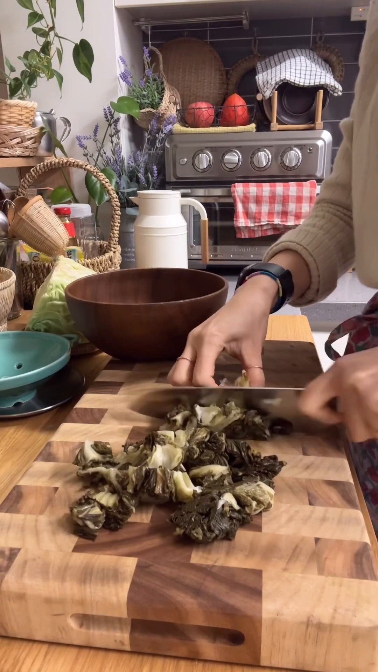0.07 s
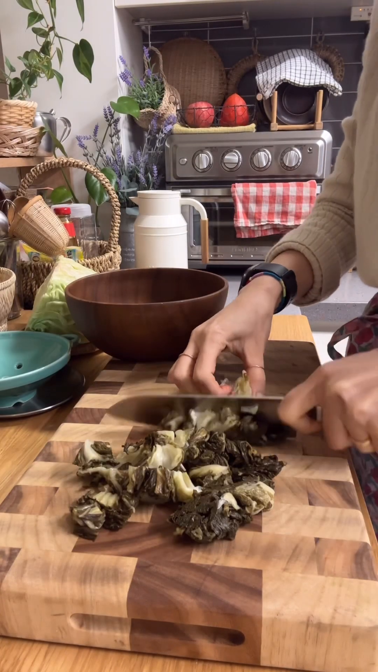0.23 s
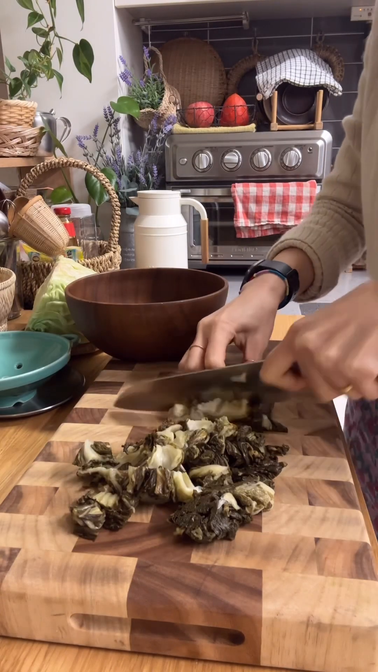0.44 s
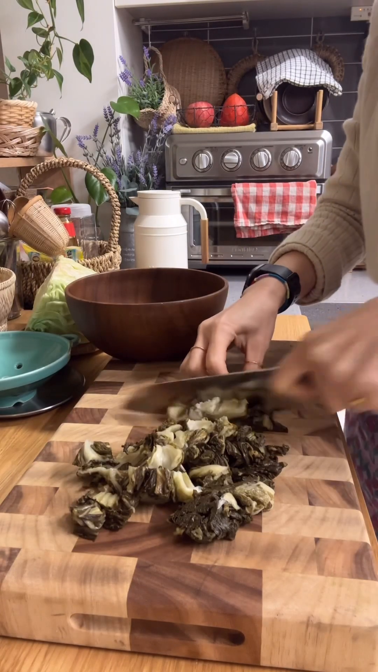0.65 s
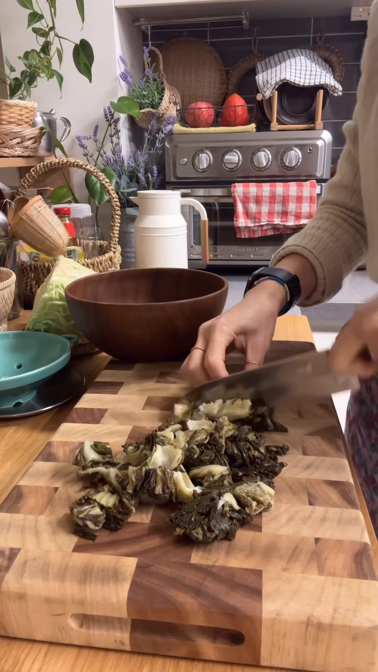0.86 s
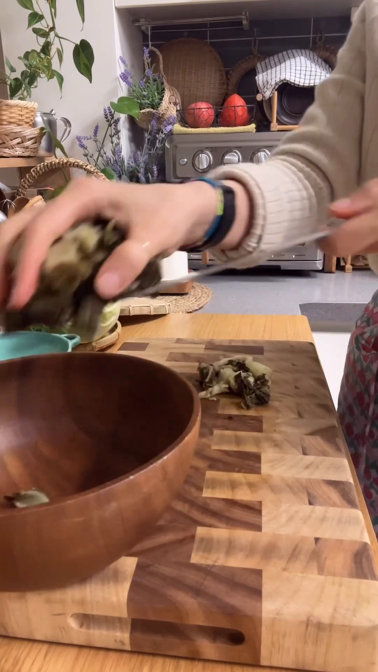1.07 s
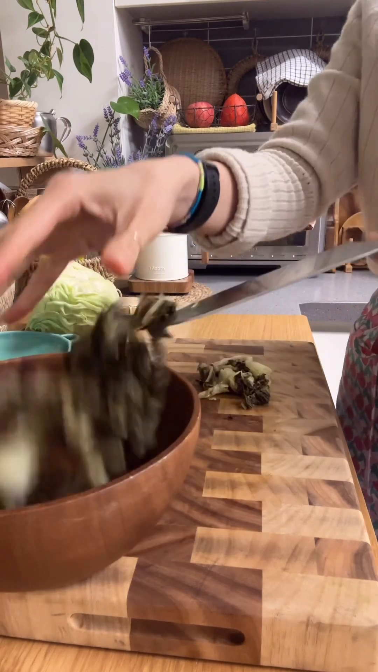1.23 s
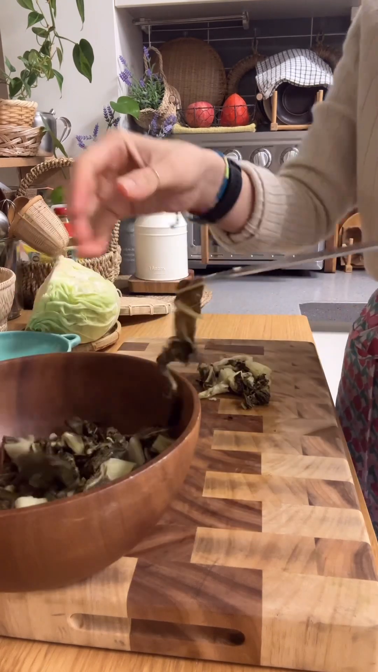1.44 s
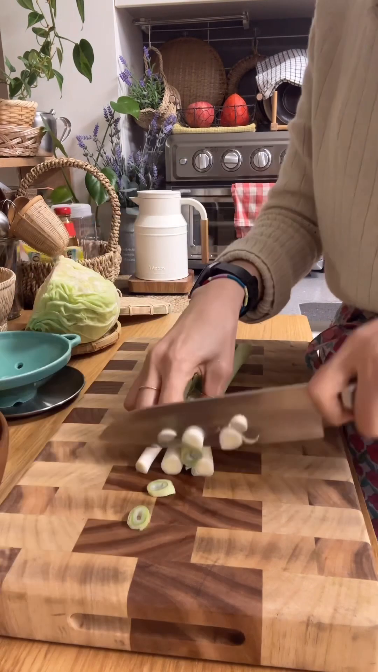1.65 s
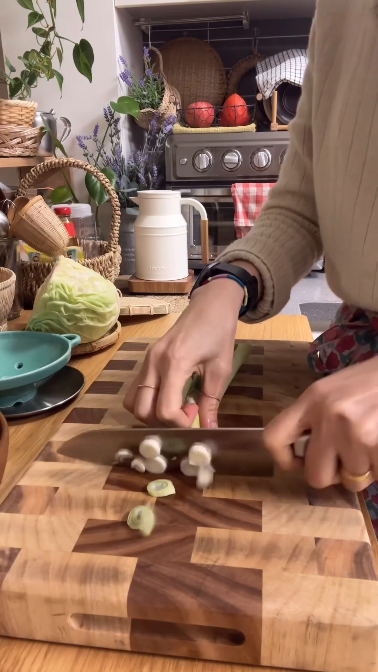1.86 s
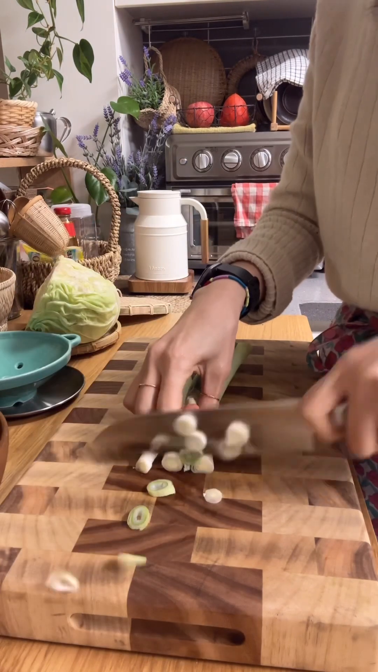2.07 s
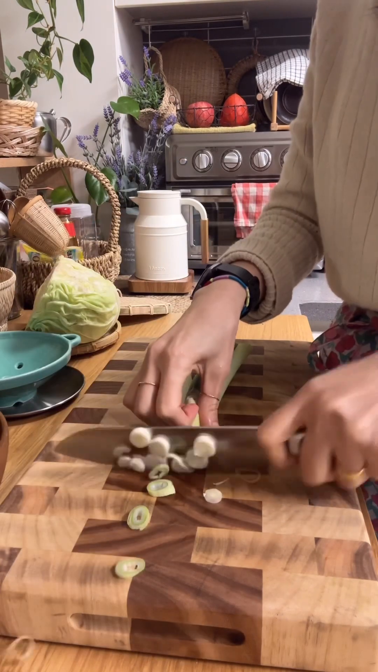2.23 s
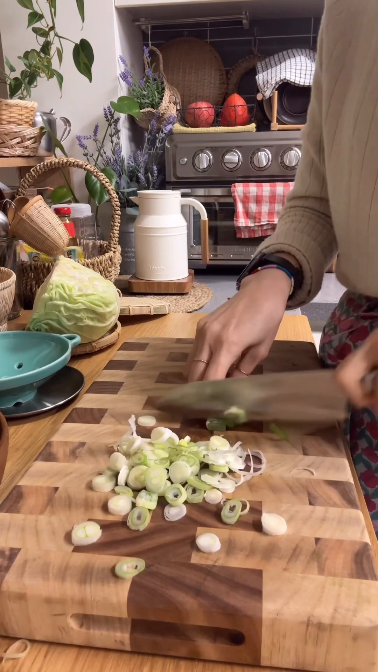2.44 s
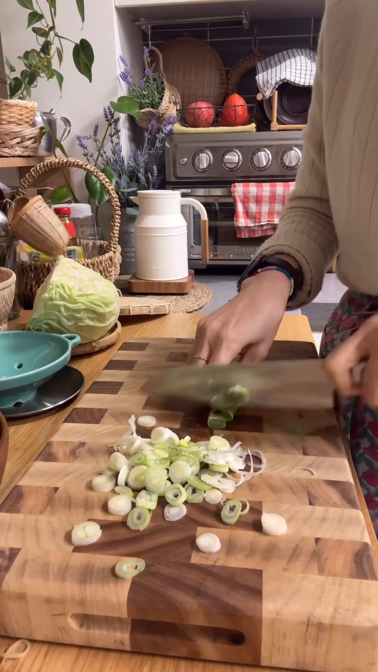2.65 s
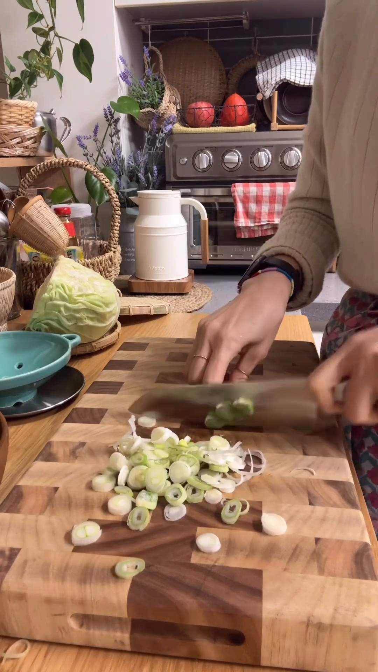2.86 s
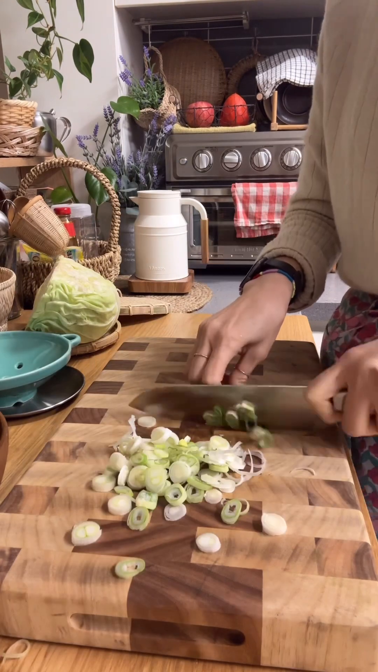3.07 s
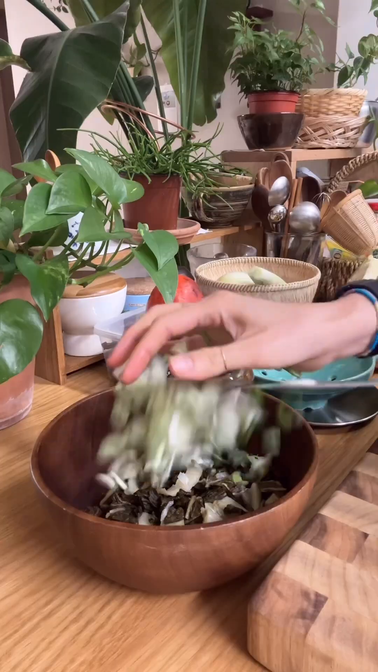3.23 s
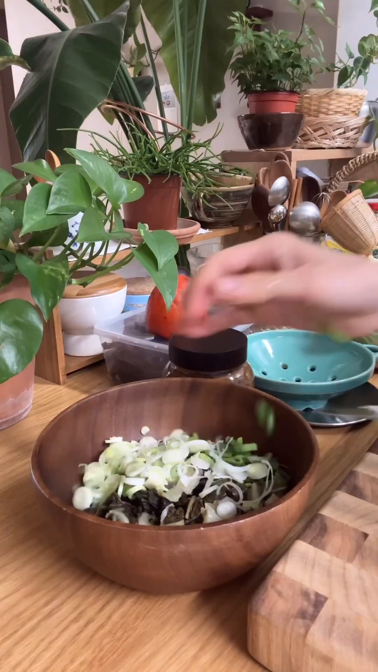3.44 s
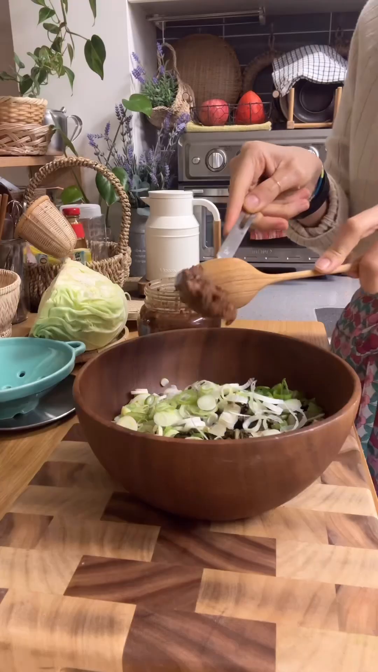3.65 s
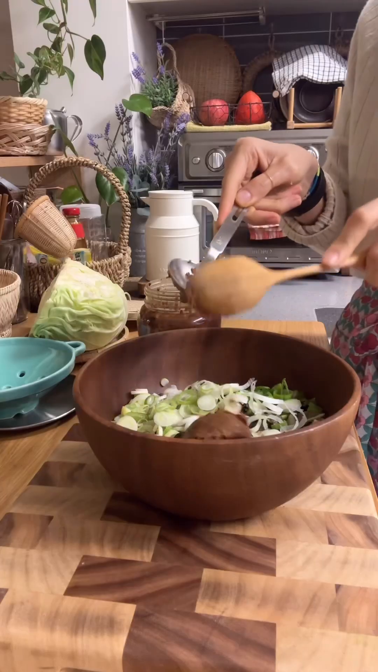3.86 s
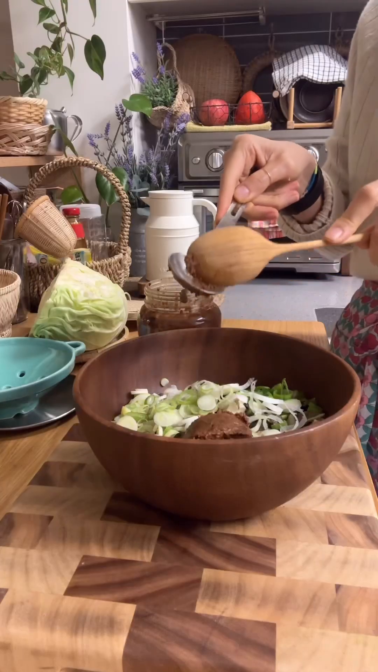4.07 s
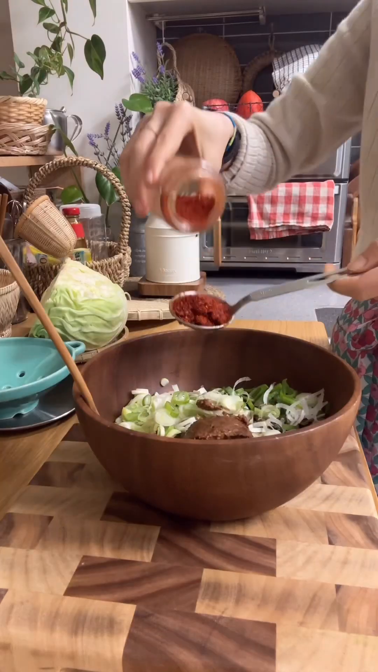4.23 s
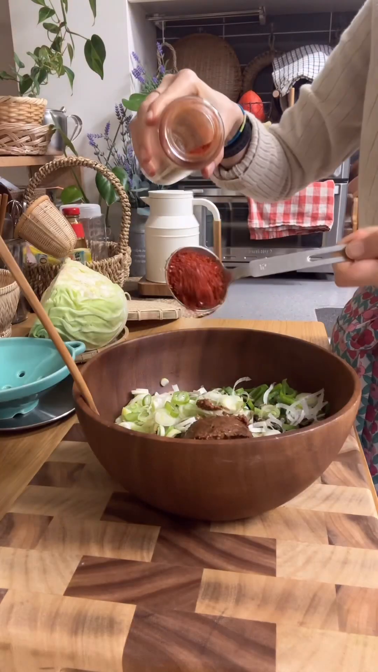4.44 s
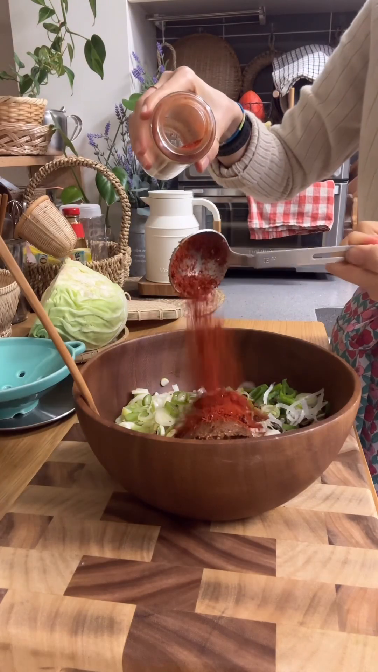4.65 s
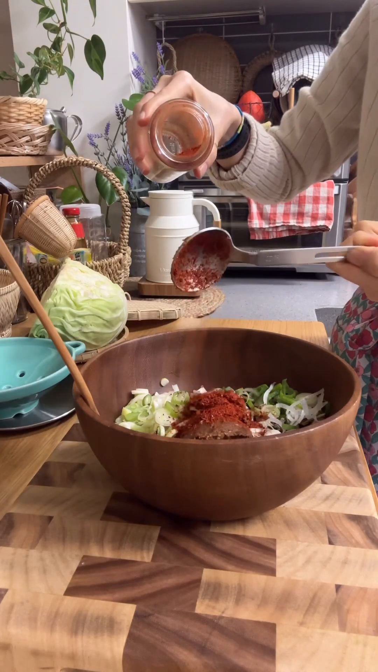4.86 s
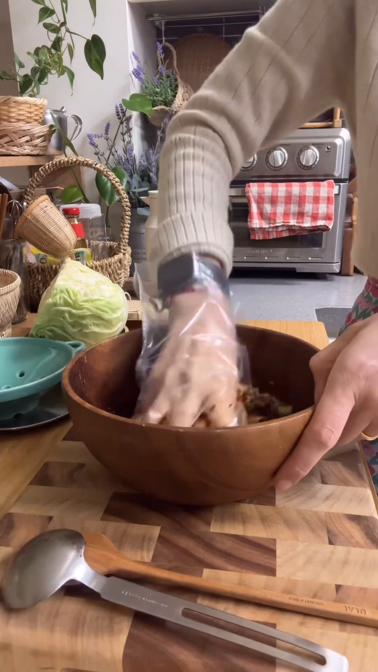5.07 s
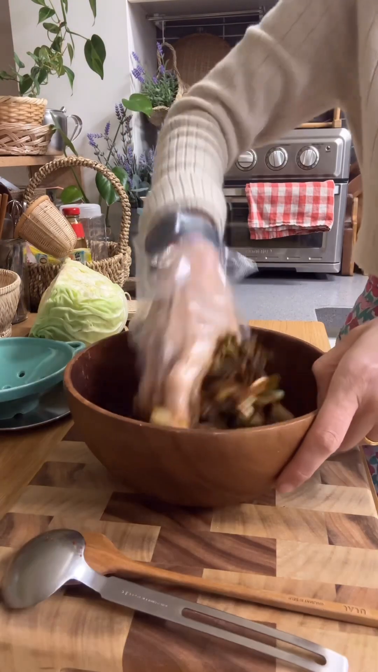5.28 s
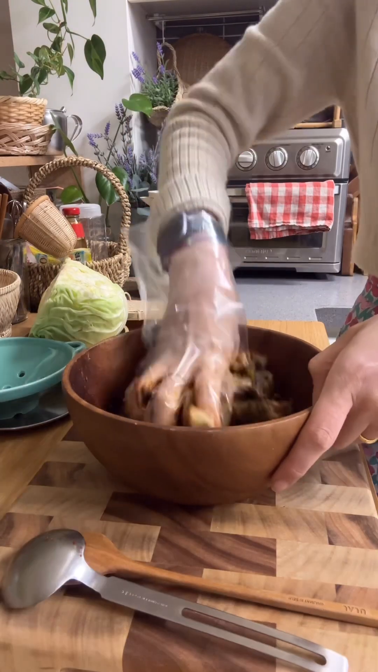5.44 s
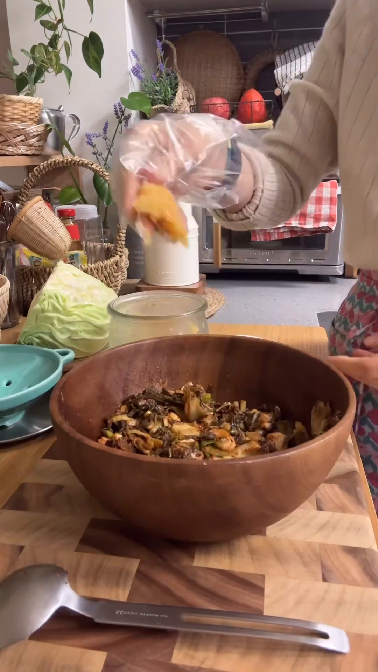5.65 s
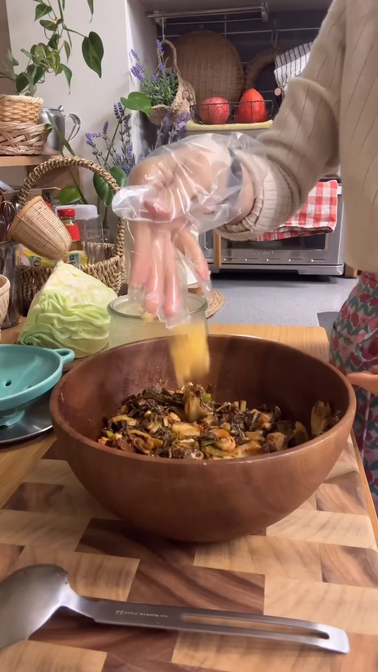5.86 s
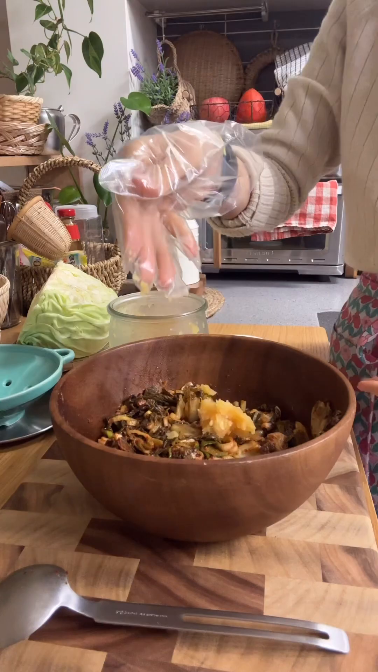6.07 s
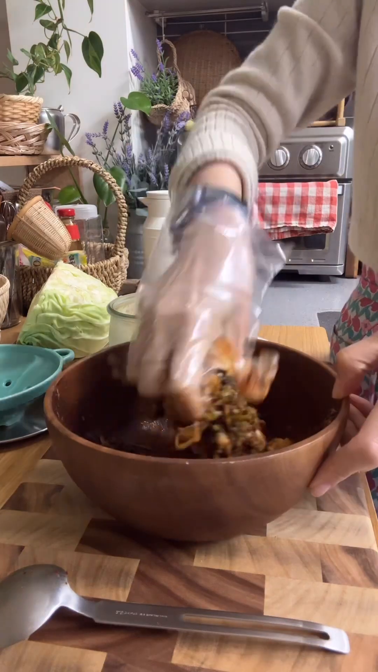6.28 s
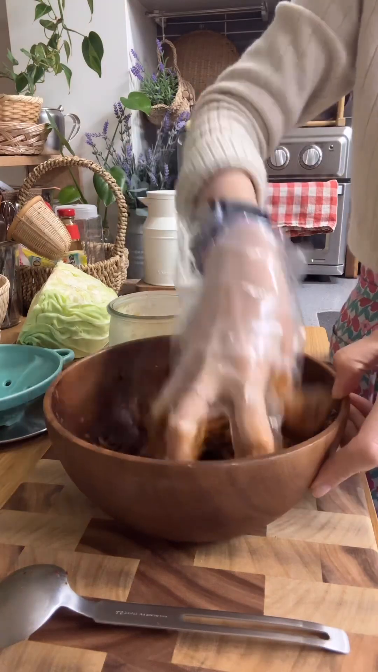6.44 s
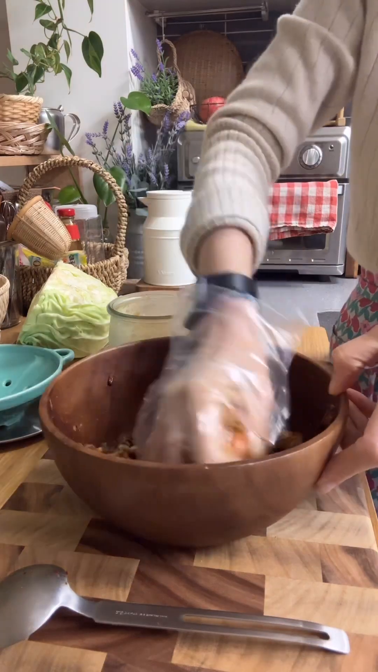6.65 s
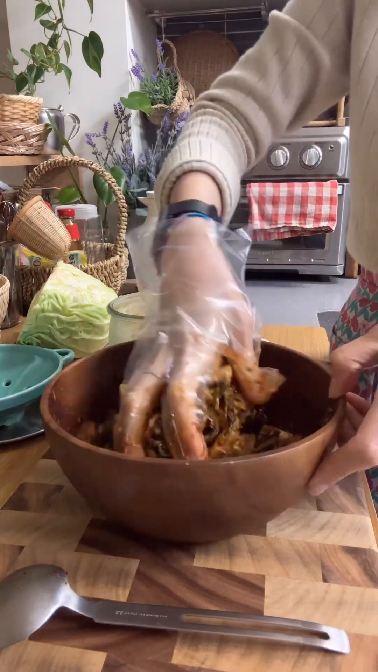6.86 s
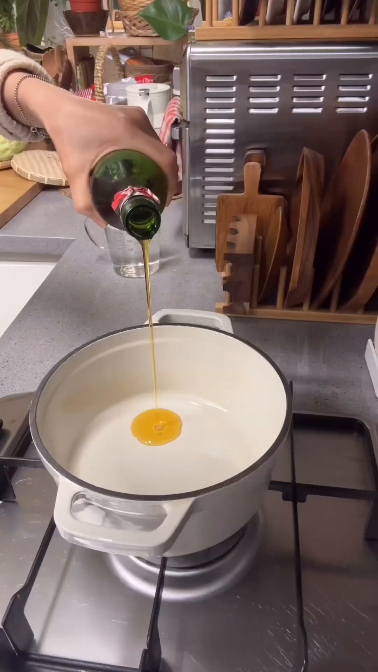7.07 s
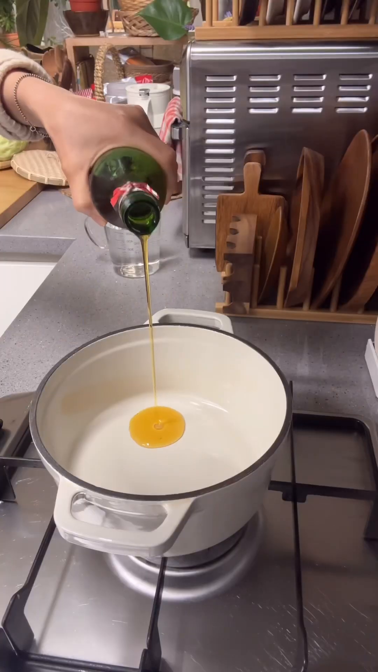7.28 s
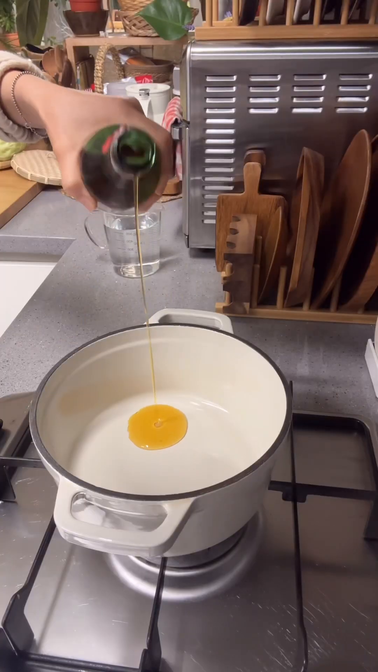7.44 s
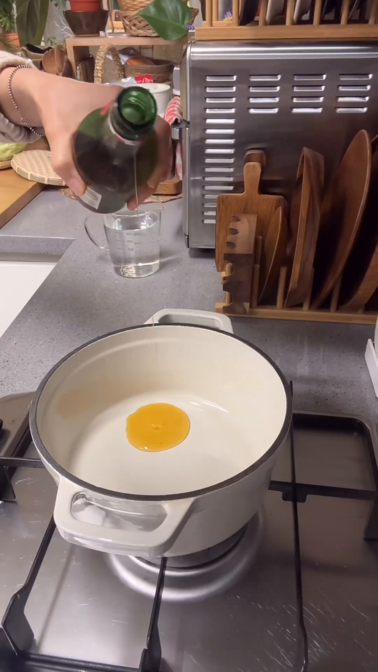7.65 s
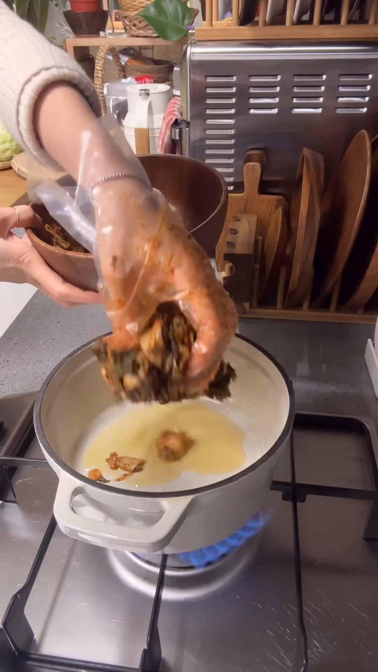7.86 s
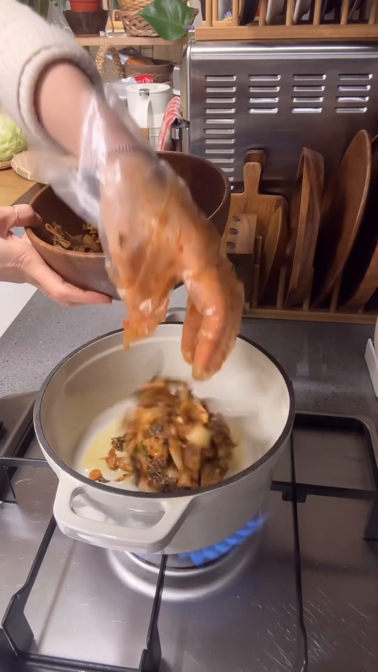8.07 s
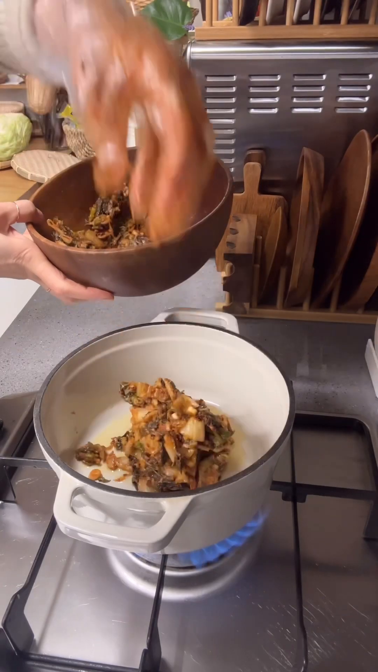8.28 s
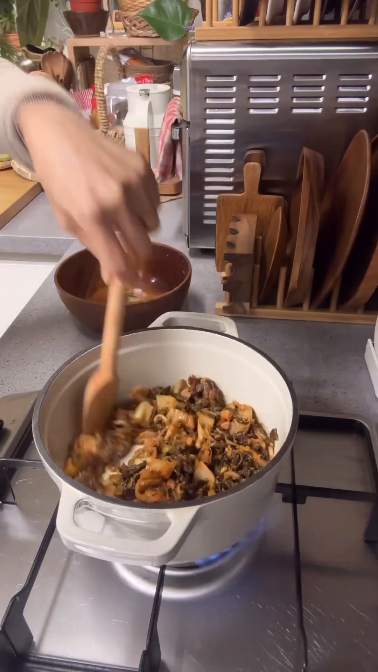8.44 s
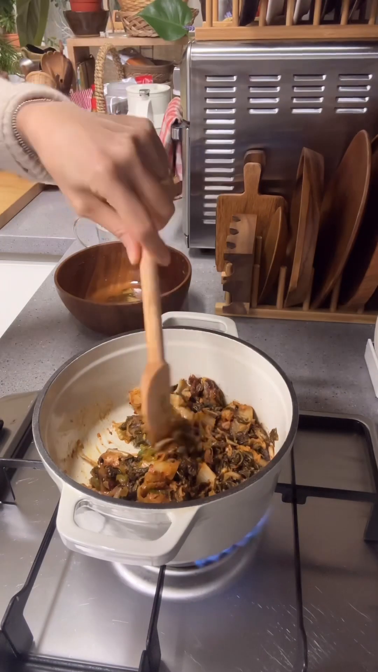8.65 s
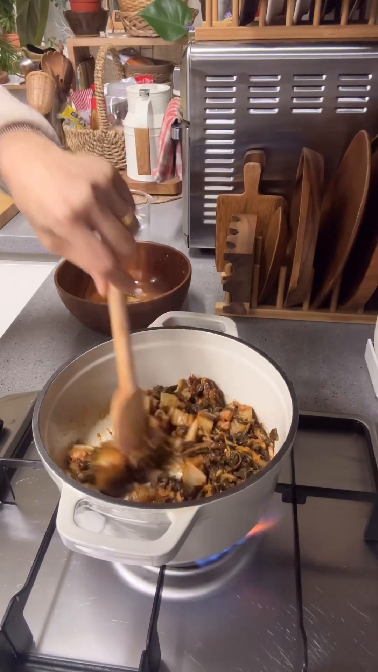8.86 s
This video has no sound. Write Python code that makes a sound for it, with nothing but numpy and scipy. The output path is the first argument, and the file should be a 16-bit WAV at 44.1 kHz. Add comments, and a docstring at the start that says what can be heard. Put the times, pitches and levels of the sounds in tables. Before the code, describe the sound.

Close stereo sound in a modest kitchen, with faint air noise and abrupt cuts. From 0 to 1 s a knife rustles and crunches through damp greens, with a short scrape near 0.2, soft board knocks around 0.6 and 0.9 and a dull thud. At 1.15-1.25 greens bump a wooden bowl. Louder crisp cuts ending in woody knocks fall near 1.7, 2.1, 2.45, 2.7 and 3.0. Onion rings patter into the bowl at 3.2-3.35; then near quiet, with a bright tick at 4.35. From 4.9 to 6.9 a thin plastic glove crinkles in uneven squeezes, with squelches, bowl bumps, snaps and brief squeaks, pausing around 5.8-6. A very faint oil trickle and rising gulps occupy 6.9-7.7. Then the flame rumbles low, clumps land softly near 8, and from 8.4 to 9 a dense bubbling sizzle surges with sharp spits and enamel pot taps.

```python
"""A home cook at work, heard close by in short passages that break off abruptly; levels are set per gesture.
A knife crunches greens and spring onions (bursting fibres) and knocks on a thick board (damped modes),
between some strokes greens bump a wooden bowl; a gloved hand then kneads them there (crackle, stick-slip squeaks).
Oil runs into a pot (noise and rising notes), a gas flame rumbles, and the greens sizzle as they are stirred
(bursts and bubbles that excite the pot's modes). Air noise and a low rumble lie underneath."""
import sys
import numpy as np
from scipy import signal
from scipy.fft import rfft, irfft, next_fast_len
from scipy.io import wavfile
from scipy.ndimage import uniform_filter1d

SR = 44100
rng = np.random.default_rng(int(sys.argv[2]) if len(sys.argv) > 2 else 0)


def unload_audio(sound):
    """Save the sound as a 16-bit wav file, at the path given as the first command line argument."""
    columns = np.transpose(np.atleast_2d(sound))
    # keep every value between -1 and 1, then stretch to whole-number steps
    steps = np.round(np.clip(columns, -1, 1) * 32767)
    wavfile.write(sys.argv[1], SR, steps.astype(np.int16))


N = 392931

# edges of the passages: (time [s])
PASSAGE_EDGES = [0, .285, 1.0, 1.56, 3.1, 4.35, 4.9, 5.65, 6.11, 6.908, 7.69, 8.399, 9]
STOVE_S, FLAME_S, STIR_S, END_S = PASSAGE_EDGES[-4:]
# knife strokes, a crunch that ends in a knock: (time of knock [s], knock level [dB], hardness [Hz],
# time in the stalks [s], crunch level [dB], growth of the crunch [dB])
STROKES = [(0.017, -39, 1490, 0.048, -41.5, -7), (0.6234, -32.5, 835, 0.083, -38.5, 19.5),
           (0.874, -37, 720, 0.047, -39.5, 18), (1.7189, -22, 860, 0.11, -36, -4.5),
           (2.0806, -22.5, 900, 0.091, -36, -4), (2.440, -16.5, 1380, 0.064, -32.5, 14.5),
           (2.7246, -21, 1350, 0.07, -34, 11), (2.9909, -17, 1300, 0.065, -35, 15.5)]
# modes of the enamelled pot: (frequency [Hz], level [dB], t60 [s])
POT_MODES = [(725, 0, .06), (885, -5, .07), (1200, -4, .06), (1390, 8, .028), (2050, 3, .033),
             (2875, -3, .08), (3470, -3, .04), (3820, -6, .07)]


def efforts():
    """Source strength: how hard the knife cuts, the hand kneads and the greens fry, as gains over time."""
    # squeezes of the gloved hand: (start [s], end [s], level at the end [dB])
    squeezes = [(4.885, 5.042, -39), (5.11, 5.323, -47), (5.336, 5.615, -41.5), (5.623, 5.805, -51.5),
                (6.007, 6.094, -58.5), (6.057, 6.309, -47), (6.262, 6.326, -43.5), (6.397, 6.573, -40),
                (6.582, 6.891, -43.5)]
    # clumps of greens landing in the hot oil: (time of peak [s], level [dB], length [s])
    clump_drops = [(7.702, -55, 0.66), (7.94, -46.5, 0.035), (8.015, -44.5, 0.085), (8.3, -57.5, 0.27)]
    # spoon strokes turning wet greens onto the hot base: (time of peak [s], level [dB], length [s])
    spoon_turns = [(8.402, -31.5, 0.59), (8.835, -35, 0.31)]
    cut = sum(press(s - length, s, db, growth_db, attack_s=0.028, release_s=0.045)
              for s, _, _, length, db, growth_db in STROKES)
    knead = sum(press(start, end, db, growth_db=2, attack_s=0.036, release_s=0.099)
                for start, end, db in squeezes)
    # steady sizzle before and during the stirring
    heat = amp(-64) * during(FLAME_S, STIR_S) + amp(-44) * during(STIR_S, END_S)
    heat = heat + swells(clump_drops, rise=0.34) + swells(spoon_turns, rise=0.69)
    return cut, knead, heat


def knife(cut):
    """Fracture and friction: fibres burst under the blade; scrape, rustle and the blade's faint song join in."""
    # spectrum of the crunch: (frequency [Hz], level per Hz [dB])
    crunch_colour = [(170, -1.5), (350, -7.5), (800, -3), (1400, -6.5), (2100, -1), (3000, -8.5),
                     (4200, -10.5), (6000, -7), (9000, -16.5), (12000, -8), (15500, -23)]
    crunch = crackle(crunch_colour, per_s=3500, spread_db=2.8, wash=.7, clump_db=2.3)
    return cut * patchy(crunch, patch_db=1.3) + blade_scrape() + rustle_and_tail() + blade_song()


def blade_scrape():
    """Dry friction: the blade chatters as it is dragged over the board."""
    # one drag: (start [s], end of the push [s])
    drag_times = (.21, .238)
    # spectrum of the scrape: (frequency [Hz], level per Hz [dB])
    scrape_colour = [(200, -17), (700, -14), (980, 0.5), (1200, -18), (1550, 7), (2600, -5), (3600, -9.5),
                     (5600, -12.5), (7300, -6), (9000, -29), (11000, -5.5), (15500, -49.5)]
    drag = press(*drag_times, db=-29.5, growth_db=8.0, attack_s=0.00061, release_s=0.087)
    return drag * crackle(scrape_colour, per_s=900, spread_db=3, wash=0.55, clump_db=1.2)


def rustle_and_tail():
    """Random small impacts: loose leaves, onion rings and chilli flakes rustle; one swell is a room tail."""
    # slides, and at 1.57 s the fading room tail of a knock: (time of peak [s], level [dB], length [s])
    rustle_rows = [(.19, -51.5, 0.26), (.315, -44.5, 0.18), (.48, -56.5, 0.38), (.755, -47.5, 0.21),
                   (.9, -43, 0.11), (1.07, -61.5, 0.89), (1.225, -50.5, 0.14), (1.57, -58, 0.24),
                   (3.135, -62, 0.21), (3.275, -48, 0.14), (4.61, -67.5, 0.89)]
    # spectrum of the rustle: (frequency [Hz], level per Hz [dB])
    leaf_colour = [(200, 11), (900, 3), (2500, 2), (4000, -1.5), (6500, 3), (11000, 0), (15500, -4)]
    gain = swells(rustle_rows, rise=0.51)
    rustle = crackle(leaf_colour, per_s=1100, spread_db=4.5, wash=0.93, clump_db=1.0)
    rustle = gain * patchy(rustle, patch_db=2.5)
    return rustle + snaps(strays(gain, over_db=-5.0, spread_db=-7, hz=5500, count=14))


def blade_song():
    """Narrow resonance: the blade sings faintly along wet greens and lingers once, noisy and sinking in pitch."""
    # wipes, and at 3.12 s the knife's faint lingering ring:
    # (time of peak [s], level [dB], length [s], frequency at the peak [Hz])
    song_rows = [(0.15, -56, 0.55, 2870), (0.49, -60, 0.41, 2530), (0.649, -54, 0.44, 2446),
                 (1.28, -55, 0.14, 2500), (3.12, -63.5, 0.22, 2570), (3.12, -68, 0.37, 1610)]
    sag_hz_per_s = 700
    t, out = np.arange(N) / SR, 0
    for s, db, length, hz in song_rows:
        tone = narrow(N, hz - sag_hz_per_s * (t - s), width_hz=300)
        out = out + swells([(s, db, length)], rise=0.39) * tone
    return out


def knocks():
    """Impact: blows on board, bowl and pot, slumping greens, thuds and the notes of the pouring oil."""
    return board_knocks() + bowl_bumps() + pot_taps() + slumps() + thuds() + oil_gulps()


def board_knocks():
    """Modal impact: blade and loose slices ring the thick board."""
    # modes of board and blade: (frequency [Hz], level [dB], t60 [s])
    board_modes = [(178, -13.5, 0.089), (205, -18.5, 0.46), (385, -24, 0.084), (484, -1, 0.061),
                   (673.3, 1, 0.05), (748.5, 4.5, 0.02), (845, -2, 0.038), (1044, 4, 0.031),
                   (1172, 1, 0.029), (1268, 8, 0.026), (1830, 6.5, 0.035), (1880, -6.5, 0.11),
                   (2100, -1, .03), (2380, -2, 0.07), (3800, -3.5, 0.058)]
    # lighter contacts between strokes: (time [s], level [dB], hardness [Hz])
    light_contacts = [(0.907, -42, 1300), (1.817, -44, 724), (1.933, -50.5, 550), (2.304, -46, 621.4),
                      (2.342, -48.5, 614.3), (2.903, -48.5, 810)]
    blows = [row[:3] for row in STROKES] + light_contacts
    return struck(board_modes, blows, grain_db=-8.0, grain_t60=0.045)


def bowl_bumps():
    """Modal impact: greens and knuckles ring the wooden bowl."""
    # modes of the bowl: (frequency [Hz], level [dB], t60 [s])
    bowl_modes = [(188, -11, 0.17), (310.4, -15.5, 0.17), (406, -11.5, 0.11), (560, -23, 0.019),
                  (747.5, -0.5, 0.087), (900, 9.5, 0.016), (1120, -15.5, 0.033)]
    # bumps: (time [s], level [dB], hardness [Hz])
    bump_rows = [(1.143, -46, 547), (1.217, -52, 990), (1.2488, -36.5, 2700), (1.2555, -30.5, 635),
                 (3.251, -48, 825), (3.303, -50, 900), (3.325, -48.5, 1213), (4.938, -38.5, 870),
                 (5.333, -28, 900), (6.5241, -33.5, 1110)]
    return struck(bowl_modes, bump_rows, grain_db=-2.5, grain_t60=0.097, order=4)


def pot_taps():
    """Modal impact: greens and the wooden spoon ring the pot."""
    # taps: (time [s], level [dB], hardness [Hz])
    tap_rows = [(8.006, -41.5, 2620), (8.59, -39.5, 1490), (8.731, -36.5, 1530), (8.854, -38.5, 3500),
                (8.888, -39, 1410)]
    return struck(POT_MODES, tap_rows, grain_db=-12.0, grain_t60=.04)


def slumps():
    """Heavily damped resonance: a wet mass of greens slumps as a swell of narrow-band noise."""
    # slumps in bowl or pot: (time of peak [s], level [dB], length [s])
    slump_rows = [(6.555, -42.5, 0.15), (8.045, -45, 0.15)]
    return swells(slump_rows, rise=0.36) * narrow(N, 280, width_hz=660)


def thuds():
    """Single damped mode: each dull push makes table or stove give as one decaying sine."""
    # pushes: (time [s], level [dB], frequency [Hz], t60 [s])
    thud_rows = [(0.021, -31, 62, 0.12), (0.926, -20.5, 93, 0.02), (1.146, -44, 150.2, 0.81),
                 (1.152, -29, 205, 0.064), (3.695, -42.5, 52.16, 0.14), (3.86, -43.5, 54.66, 0.16),
                 (6.549, -39, 111, 0.069), (8.043, -42, 160, 0.12)]
    out, t = np.zeros(N), np.arange(SR // 3) / SR
    for s, db, hz, t60 in thud_rows:
        add(out, s, amp(db - 60 * t / t60) * np.sin(2 * np.pi * hz * t))
    return out


def oil_gulps():
    """Cavity resonance: air gulped into the oil bottle sounds a decaying note that climbs in pitch."""
    # gulps: (time [s], level [dB], starting frequency [Hz], t60 [s])
    gulp_rows = [(6.996, -56, 1320, .22), (7.0, -62, 1780, .09), (7.409, -52, 995, .17)]
    climb, climb_s = 0.036, .03  # share of the pitch, time constant
    out, t = np.zeros(N), np.arange(SR // 3) / SR
    for s, db, hz, t60 in gulp_rows:
        pitch = hz * (1 + climb * (1 - np.exp(-t / climb_s)))
        add(out, s, amp(db - 60 * t / t60) * np.sin(2 * np.pi * np.cumsum(pitch) / SR))
    return out


def glove(knead):
    """Crumpling and stick-slip: thin plastic crinkles, wet greens squelch, rubbed surfaces squeak."""
    # spectrum of the crinkle: (frequency [Hz], level per Hz [dB])
    glove_colour = [(60, -8.5), (200, -1), (400, -3), (850, 1.5), (1400, -3), (2100, 0), (3900, -5.5),
                    (6000, 3), (9000, -5), (12000, -1), (15500, -15)]
    # spoon, glove and wet greens rubbing: (start [s], end [s], level [dB], frequency [Hz], width [Hz])
    squeak_rows = [(5.612, 5.641, -41.5, 3900, 1800), (6.483, 6.552, -41.5, 786, 300),
                   (6.875, 6.911, -40, 953, 220)]
    crinkle = crackle(glove_colour, per_s=850, spread_db=4.1, wash=.35, clump_db=1.3)
    out = knead * (patchy(crinkle, patch_db=2.3) + amp(-11) * bubbles())
    for start, end, db, hz, width_hz in squeak_rows:
        count = max(int((end - start) * SR), 64)
        add(out, start, amp(db) * narrow(count, hz, width_hz) * signal.windows.tukey(count, .4))
    return out


def sharp_clicks(heat):
    """Brief release of energy: snaps of fibre, film and spitting fat, a spoon's tick, pattering onion rings."""
    # single snaps of fibre, film and spitting fat, and at 4.3507 s a spoon's tick on a jar:
    # (time [s], peak level [dB], centre [Hz])
    loud_clicks = [(.2385, -27, 6000), (1.467, -51, 6000), (1.628, -25.5, 6650), (3.463, -47, 4190),
                   (3.5851, -39, 7230), (4.3507, -23.5, 11800), (4.9035, -34, 5700), (5.198, -36, 5150),
                   (5.4269, -22, 10500), (6.0402, -30, 8300), (6.264, -23, 10000), (6.3755, -21.5, 6500),
                   (6.525, -15.5, 7000), (6.533, -18, 11000), (6.6315, -28, 6000), (6.6665, -20, 6430),
                   (6.8085, -23, 4500), (6.848, -22.5, 4500), (7.7307, -23, 6330), (7.8357, -17.5, 6900),
                   (8.4857, -6, 7700), (8.6132, -14, 6740), (8.8553, -8, 6060), (8.89, -13, 5500)]
    # onion rings falling into the bowl: (time [s], peak level [dB], centre [Hz])
    ring_falls = [(3.213, -47, 5480), (3.245, -36.5, 3540), (3.278, -35, 3930), (3.298, -37.5, 3850),
                  (3.327, -43, 3700)]
    spits = strays(heat, over_db=18, spread_db=3.0, hz=6700, count=12)
    return snaps(loud_clicks + spits) + snaps(ring_falls, t60=0.042, sharp_hz=1590)


def stove(heat):
    """Boiling in fat: oil trickles into the pot, then water from the greens bursts and bubbles."""
    # the thin stream of oil thickening: (time of peak [s], level [dB], length [s])
    trickle_rows = [(7.01, -68, 0.071), (7.4, -67, 0.55)]
    # spectra of stream and sizzle: (frequency [Hz], level per Hz [dB])
    pour_colour = [(300, -0.5), (2600, 3), (4500, -5), (12000, -20.5)]
    fry_colour = [(100, -14.5), (480, -6), (700, -1), (1300, 0.5), (1650, 0), (2600, 0.5), (3800, 1),
                  (6000, 1), (12000, -1), (16000, -9)]
    stream = swells(trickle_rows, rise=0.46)
    oil = stream * crackle(pour_colour, per_s=2600, spread_db=1, wash=0.9, clump_db=1.5)
    sizzle = crackle(fry_colour, per_s=4500, spread_db=3.3, wash=.45, clump_db=.9)
    sizzle = patchy(sizzle, patch_db=1.6) + amp(-13) * bubbles()
    return in_pot(oil + heat * sizzle, ring_db=-11)


def background(cut):
    """Steady noise and tones: air in each port; in both, a wavering hum and the rumble of room and table."""
    # spectra of air and rumble: (frequency [Hz], level per Hz [dB])
    air_colour = [(50, -17), (100, -6.5), (330, -7), (900, -26), (2700, -28), (6000, -39.5), (12000, -50)]
    rumble_colour = [(20, -24), (50, 3.5), (170, -1), (300, -14), (2000, -62.5)]
    # stove hum: (frequency [Hz], rms level [dB])
    hum_tones = [(48, -58), (101, -60)]
    # low rumbles as bowl and spoons are handled: (time of peak [s], level [dB], length [s])
    handling = [(3.7, -65, 0.84), (5.27, -53.5, 0.25)]
    t = np.arange(N) / SR
    air = np.array([coloured(z, air_colour) for z in rng.standard_normal((2, N))])
    keep = np.exp(-1 / (0.052 * SR))  # the table goes on shaking, time constant in s
    table = signal.lfilter([1 - keep], [1, -keep], amp(-6) * cut)
    flame = amp(-54.5) * during(FLAME_S, END_S)
    shake = amp(-65) + flame + table + swells(handling, rise=0.84)
    hum = sum(amp(db) * np.sqrt(2) * np.sin(2 * np.pi * hz * t) for hz, db in hum_tones)
    hum = hum * during(STOVE_S, END_S)
    rumble = shake * coloured(rng.standard_normal(N), rumble_colour)
    return amp(-69) * air + rumble + hum * amp(2.5 * wander(size=3000))


def crackle(colour, per_s, spread_db, wash, clump_db, split_hz=3000):
    """Shot noise: uneven tiny bursts over a noise wash; dull and bright bursts clump partly on their own."""
    surge, out = 0.52 * wander(size=800), 0
    for band, uneven_db in (("lowpass", spread_db / 2), ("highpass", spread_db)):
        sizes = amp(uneven_db * np.minimum(rng.exponential(1, N), 4)) * rng.choice([-1, 1], N)
        bursts = unit(sizes * (rng.random(N) < per_s / SR)) + wash * rng.standard_normal(N)
        clumped = bursts * amp(clump_db * (surge + wander(size=220)))
        out = out + signal.lfilter(*signal.butter(2, split_hz, band, fs=SR), clumped)
    return coloured(out, colour)


def struck(modes, blows, grain_db, grain_t60, order=2, bend_hz=900, low_hz=120):
    """Modal synthesis: a blow rings modes up to its hardness, treble first, with a noise burst of denser ones."""
    out, t, pole = np.zeros(N), np.arange(SR // 4) / SR, np.exp(-2 * np.pi * bend_hz / SR)
    for s, db, hard_hz in blows:
        ring = 0
        for hz, mode_db, t60 in modes:
            # modes near the hardness are favoured, and no two blows excite them alike
            favour_db = 5.6 * np.exp(-(np.log2(hz / hard_hz) / .5) ** 2)
            level_db = mode_db + rng.standard_normal() + favour_db
            ring = ring + amp(level_db - 60 * t / t60) * np.cos(2 * np.pi * hz * t)
        for edge_hz in (hard_hz, 2 * hard_hz):
            ring = signal.lfilter(*signal.butter(order, edge_hz, fs=SR), ring)
        # five all-pass stages delay the bass
        ring = signal.sosfilt([[-pole, 1, 0, 1, -pole, 0]] * 5, ring)
        band = signal.butter(order + 1, [low_hz, hard_hz], "bandpass", fs=SR, output="sos")
        dense = signal.sosfilt(band, rng.standard_normal(len(t))) * amp(-60 * t / grain_t60)
        blow = ring / np.linalg.norm(ring) + amp(grain_db) * dense / np.linalg.norm(dense)
        add(out, s, amp(db) * blow * np.sqrt(SR / 100))  # the level refers to energy within 10 ms
    return out


def narrow(count, hz, width_hz):
    """Noise-driven resonance: irregular slips feed one band, whose pitch may move; rms 1."""
    slips = rng.standard_normal(count) + 1j * rng.standard_normal(count)
    slips = signal.lfilter(*signal.butter(2, width_hz / 2, fs=SR), slips)
    carrier = np.exp(2j * np.pi * np.cumsum(hz * np.ones(count)) / SR)
    return unit((slips * carrier).real)


def snaps(rows, t60=0.03, sharp_hz=7000):
    """Impulse response: a click and a trace of fizz excite one resonance, sharper at higher centres."""
    out, t = np.zeros(N), np.arange(SR // 100) / SR
    for s, db, hz in rows:
        push = (t == 0) + 0.084 * rng.standard_normal(len(t)) * amp(-60 * t / t60)
        sharpness = max((hz / sharp_hz) ** 2, 1)
        click = signal.lfilter(*signal.iirpeak(min(hz, SR / 3), sharpness, fs=SR), push)
        add(out, s, amp(db) * click / abs(click).max())
    return out


def strays(effort, over_db, spread_db, hz, count):
    """Poisson-like events: snaps at chance moments of effort, with levels spread around over_db above it."""
    busy, rows = np.flatnonzero(effort > amp(-62)), []
    for when, size, pitch in rng.random((count, 3)):
        at = busy[int(when * len(busy))]
        db = 20 * np.log10(effort[at]) + over_db + spread_db * (2 * size - 1)
        rows.append((at / SR, db, hz * 2 ** (pitch - .5)))
    return rows


def bubbles(per_s=350, low_hz=1000, high_hz=5500, cycles=24, spread_db=3):
    """Bubble resonance: tiny wet pops, each at its own pitch, falling 60 dB in a few cycles; rms 1."""
    out, t = np.zeros(N), np.arange(SR // 40) / SR
    for when, pitch, size in rng.random((int(per_s * N / SR), 3)):
        turns = low_hz * (high_hz / low_hz) ** pitch * t
        level_db = -spread_db * np.log(1 - size) - 60 * turns / cycles
        add(out, when * N / SR, amp(level_db) * np.sin(2 * np.pi * turns))
    return unit(out)


def in_pot(x, ring_db):
    """Sympathetic resonance: sound made inside the pot also sets its modes ringing."""
    t = np.arange(SR // 10) / SR
    ring = sum(amp(db - 60 * t / t60) * np.cos(2 * np.pi * hz * t) for hz, db, t60 in POT_MODES)
    return signal.oaconvolve(x, (t == 0) + amp(ring_db) * ring / np.linalg.norm(ring))[:N]


def patchy(x, patch_db, size=384):
    """Spectral fluctuation: colour shifts in patches a few hundred Hz wide and tens of ms long; rms 1."""
    z = signal.stft(x, nperseg=size)[2]
    field = rng.standard_normal(z.shape)
    for _ in range(2):
        field = uniform_filter1d(uniform_filter1d(field, size=3, axis=0), size=5, axis=1)
    return unit(signal.istft(z * amp(patch_db * unit(field)), nperseg=size)[1][:N])


def coloured(x, colour):
    """Minimum-phase filtering: a causal response with the given spectrum; rms 1."""
    log_gain = np.log(amp(read(colour, abs(np.fft.fftfreq(4096, 1 / SR)))))
    response = np.fft.ifft(np.exp(np.conj(signal.hilbert(log_gain)))).real
    return unit(signal.oaconvolve(x, response)[:N])


def wander(size):
    """Smoothed noise: chance of rms 1 that changes about every size samples."""
    return unit(uniform_filter1d(uniform_filter1d(rng.standard_normal(N), size), size))


def during(start, end):
    """Rectangular gate: 1 between two times, else 0."""
    t = np.arange(N) / SR
    return 1. * ((t >= start) & (t < end))


def passage(s):
    """Rectangular gate: 1 during the passage that holds time s."""
    k = np.clip(np.searchsorted(PASSAGE_EDGES, s), 1, len(PASSAGE_EDGES) - 1)
    return during(PASSAGE_EDGES[k - 1], PASSAGE_EDGES[k])


def swells(rows, rise):
    """Exponential growth and decay: up 20 dB over the share rise of the length, down 20 dB over the rest."""
    t, out = np.arange(N) / SR, 0
    for s, db, length in rows:
        away = np.maximum((s - t) / rise, (t - s) / (1 - rise)) / length
        out = out + passage(s) * amp(db - 20 * away)
    return out


def press(start, end, db, growth_db, attack_s, release_s):
    """Growing force: a push sets in, changes by growth_db up to its end, then falls 20 dB per release_s."""
    t = np.arange(N) / SR
    ahead = np.clip((end - t) / max(end - start, attack_s), 0, 1)
    onset = np.clip((t - start) / attack_s, 0, 1) ** 2
    level_db = db - growth_db * ahead - 20 * np.maximum(t - end, 0) / release_s
    return passage((start + end) / 2) * onset * amp(level_db)


def amp(db):
    """Level to linear gain: 20 dB is a factor of ten."""
    return 10 ** (np.asarray(db) / 20)


def unit(x):
    """Power normalisation: scales to rms 1."""
    return x / np.sqrt(np.mean(x ** 2) + 1e-20)


def read(points, hz):
    """Interpolation along a log-frequency axis."""
    f, value = np.transpose(points)
    return np.interp(np.log(hz + 1), np.log(f + 1), value)


def add(mix, s, sound):
    """Superposition: mixes a sound in at time s."""
    part = mix[max(round(s * SR), 0):][:len(sound)]
    part += sound[:len(part)]


def ports(x):
    """Interaural-style phase: near sound meets two ports with a phase gap that varies with frequency."""
    # by how much the left port leads: (frequency [Hz], phase [rad])
    phase_lead = [(60, 0), (700, -.35), (1600, -.1), (2100, -.75), (2600, -.9), (3000, .9), (3900, .1),
                  (5200, 1.4), (8100, 3.14), (13000, 6.3), (16000, 8.2)]
    size = next_fast_len(N + 4096)
    turn = np.exp(.5j * read(phase_lead, np.fft.rfftfreq(size, 1 / SR)))
    return irfft(rfft(x, size) * np.array([turn, 1 / turn]), size)[:, :N]


def echo(build_s):
    """Diffuse reverberation: noise decaying at a rate set per frequency, different at each port."""
    # decay of the kitchen: (frequency [Hz], t60 [s])
    room_t60 = [(100, 0.86), (260, 0.6), (700, 0.58), (1900, 0.54), (5000, 0.38), (14000, 0.58)]
    # spectrum of its echo: (frequency [Hz], level [dB])
    room_colour = [(50, -5), (200, 3), (600, 1.5), (1200, 2), (2200, 11), (4000, 4), (6000, 4),
                   (8200, -33.5), (11000, -1), (16000, -10)]
    hz, t, z = signal.stft(rng.standard_normal((2, SR // 2)), SR, nperseg=256)
    z = z * amp(read(room_colour, hz)[:, None] - 60 * t / read(room_t60, hz)[:, None])
    tail = signal.istft(z, SR, nperseg=256)[1]
    tail *= 1 - np.exp(-(np.arange(tail.shape[1]) / SR / build_s) ** 2)
    return tail / np.linalg.norm(tail[0])


def kitchen(x, size=11000):
    """Reverberation by convolution: a new echo every size samples, cut short where each passage ends."""
    out = np.zeros((2, N))
    edges = np.minimum(np.array(PASSAGE_EDGES) * SR, N).astype(int)
    for first, last in zip(edges, edges[1:]):
        for a in range(first, last, size):
            piece = x[None, a:min(a + size, last)]
            wet = signal.fftconvolve(piece, echo(build_s=0.0054), axes=1)[:, :last - a]
            fade = np.minimum((last - a - np.arange(wet.shape[1])) / 130, 1)
            out[:, a:a + wet.shape[1]] += wet * fade
    return out


def scene():
    """Superposition: every source heard directly and through the kitchen, over the background."""
    cut, knead, heat = efforts()
    hits, cutting, cooking = knocks(), knife(cut), stove(heat)
    mixing = glove(knead) + sharp_clicks(heat)
    # the left port hears the hits slightly louder
    direct = ports(hits) * amp([[.5], [-.5]]) + ports(cutting + mixing + cooking)
    to_room = amp(-13.0) * hits + amp(-11.0) * cutting + amp(-10.5) * mixing + amp(-8.0) * cooking
    return direct + kitchen(to_room) + background(cut)


def record(dry):
    """Close spacing: the two ports share the bass; then come the bass roll-off and the band limit."""
    side = signal.lfilter(*signal.butter(1, 220, "highpass", fs=SR), (dry[0] - dry[1]) / 2)
    bass_cut = signal.butter(2, 36, "highpass", fs=SR, output="sos")
    pair = signal.sosfilt(bass_cut, dry.mean(0) + np.array([side, -side]))
    band_limit = signal.firwin(301, 15950, window=("kaiser", 9), fs=SR)
    return signal.oaconvolve(pair, band_limit[None], "same")


dry = scene()
out = record(dry)
unload_audio(out)
```